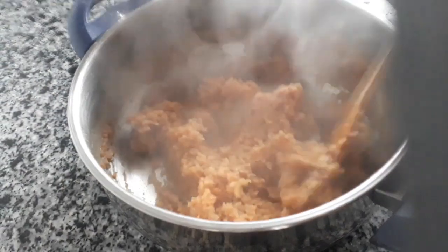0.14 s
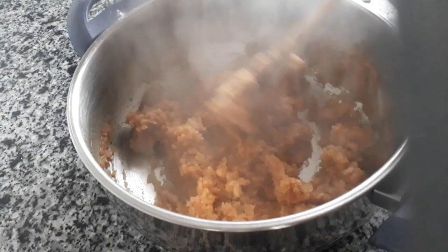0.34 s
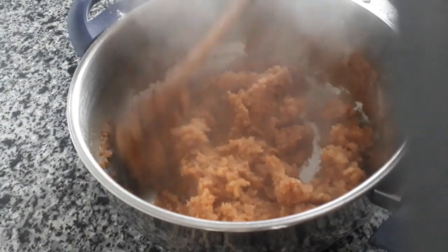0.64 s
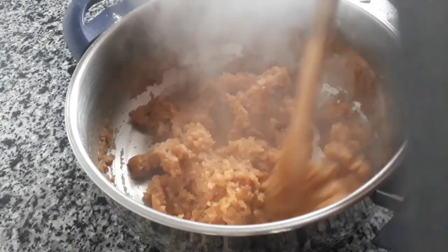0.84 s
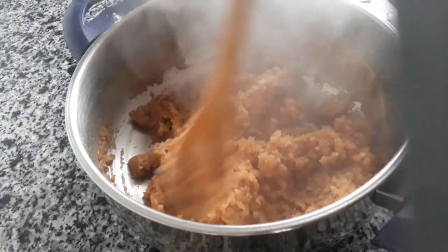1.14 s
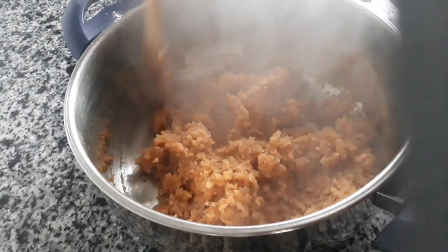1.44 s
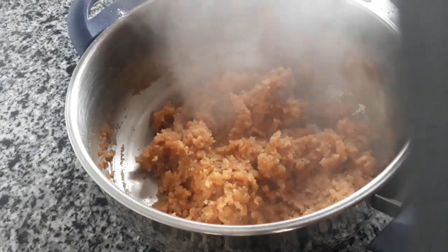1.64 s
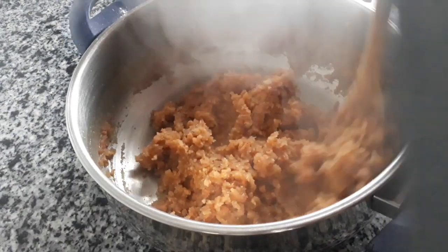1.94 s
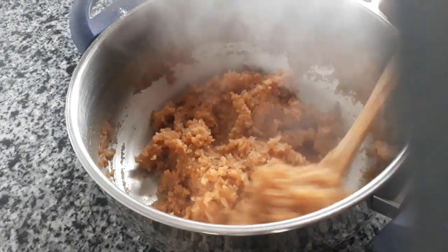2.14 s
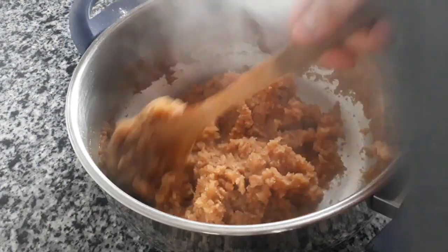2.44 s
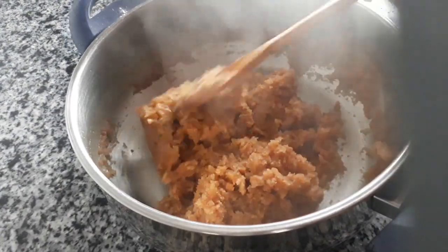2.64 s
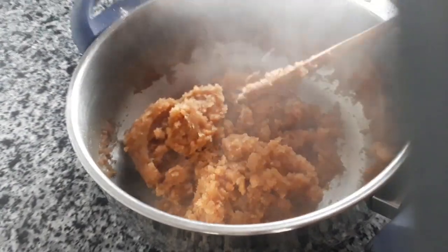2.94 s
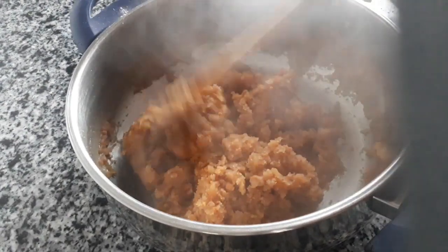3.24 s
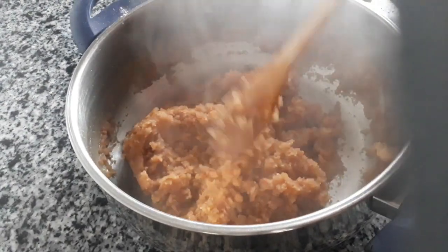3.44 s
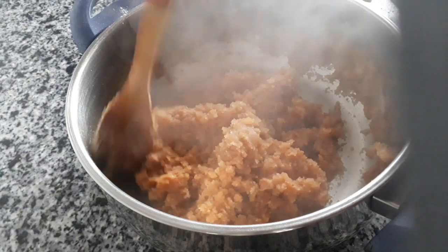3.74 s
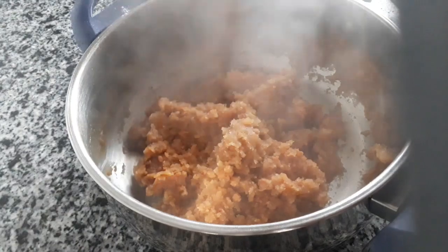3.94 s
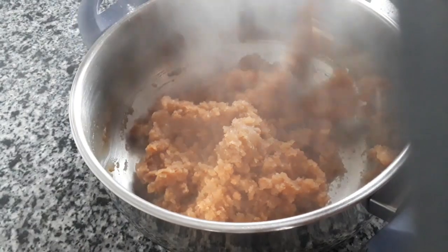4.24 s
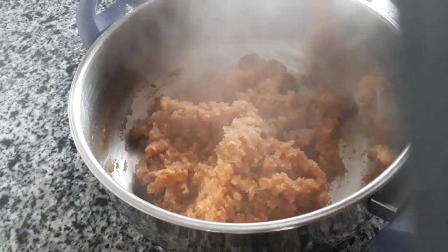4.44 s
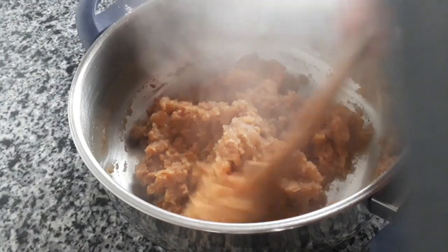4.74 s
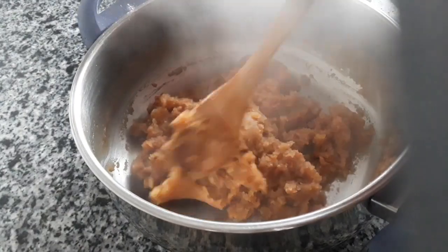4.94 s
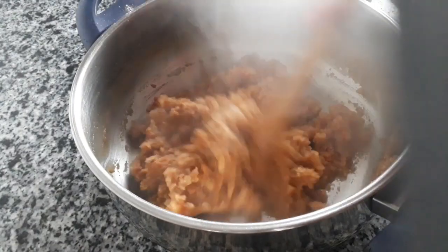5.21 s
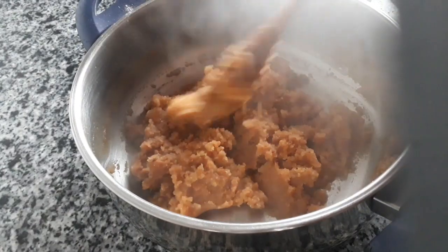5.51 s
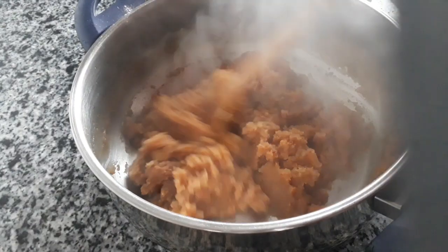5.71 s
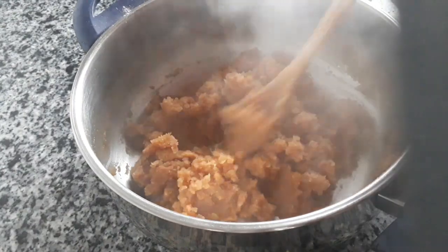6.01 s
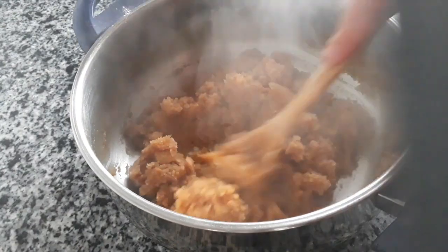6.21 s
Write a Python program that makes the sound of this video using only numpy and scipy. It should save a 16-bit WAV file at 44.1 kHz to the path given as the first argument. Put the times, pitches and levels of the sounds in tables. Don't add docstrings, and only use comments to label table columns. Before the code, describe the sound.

Close up in a tiled kitchen, a wooden spoon pushes thick paste around a steel pot. Quiet wet scrapes, dull thuds and small taps come first; near three seconds a very loud double knock cracks against the metal and wakes the room. Stickier scraping, paste snaps and a second firm knock follow, then gentle stirring with faint steam over low hum and hiss.

```python
import sys
import numpy as np
from scipy import signal
from scipy.fft import rfft, irfft, next_fast_len
from scipy.io import wavfile
from scipy.ndimage import uniform_filter1d, map_coordinates

SR = 44100
rng = np.random.default_rng(int(sys.argv[2]) if len(sys.argv) > 2 else 0)


def gain_from_db(level_db):
    decades = np.asarray(level_db, float) / 20
    return 10 ** decades


def int16_out(signal):
    q = np.round(np.clip(np.atleast_2d(signal).T, -1, 1) * 32767)
    wavfile.write(sys.argv[1], SR, q.astype(np.int16))


N = 280917

# (time [s], strength [dB], lean to the lower body mode [dB],
# centre ring [dB], edge ring [dB])
BASE_BLOWS = [(0.204, -44.5, -0.5, -5.5, 6), (0.5835, -52, 1.5, -14, -14), (0.7693, -41, 1, 2.5, -11),
              (1.2836, -41.5, 0, 0, -23), (1.7678, -63.5, -1, 1, -15), (2.381, -84, 0, 6, 17),
              (2.9209, -26, 0.5, -6.5, -11), (2.9776, -31.5, 1.5, -0.5, -1.5),
              (2.9889, -33.5, -2.5, -2.5, -14), (3.7136, -48.5, 3, -6, 4.5), (4.0401, -60, -.6, -9.5, -15),
              (4.4264, -32, -0.5, 3.5, 5), (5.149, -36, 1.4, 0, -0.5), (6.1831, -63, 1.5, -4, -15)]
# (pitch [Hz], fade by 60 dB [s], rise [s])
BASE_MODES = [(1084, 0.019, 0.00071), (235, 0.24, 0.0077), (321.8, 0.024, 0.035), (398, 0.029, 0.0062),
              (716, 0.049, 0.00037)]


def thuds():
    out = np.zeros(N + SR)
    t = np.arange(SR // 5) / SR
    deep_db = -14
    for s, blow_db, lean_db, centre_db, edge_db in BASE_BLOWS:
        strength_db = blow_db + np.array([edge_db, deep_db, lean_db, -lean_db, centre_db])
        detune = 1 + 0.023 * rng.standard_normal(len(BASE_MODES))
        modes = []
        for db, shift, (hz, t60, rise) in zip(strength_db, detune, BASE_MODES):
            modes.append(gain_from_db(db) * ring(hz * shift, t60, rise, t))
        add(out, s, kitchen(modes[0] + modes[-1], wet_db=-6.0, blow_s=0.033))
        add(out, s, kitchen(sum(modes[1:-1]), wet_db=-4, blow_s=0.04))
    return out[:N]


# (time [s], level [dB], pitch [Hz], room mode level [dB])
WORKTOP_BLOWS = [(0.202, -49, 181, -63), (0.58, -52, 194, -66), (0.768, -52.5, 175, -68),
                 (1.286, -51.5, 175, -67.5), (1.784, -61, 142, -76), (2.457, -60, 160, -93),
                 (2.694, -62, 156, -84), (2.92, -27.5, 146, -66), (2.978, -40.5, 191, -50.5),
                 (3.708, -52, 210, -67.5), (3.859, -70, 150, -71), (4.427, -46.5, 142, -75),
                 (5.151, -49.5, 158, -85), (5.711, -65, 133, -89), (5.879, -61.5, 127, -83),
                 (6.179, -63, 172.6, -79.5)]


def worktop_booms():
    out = np.zeros(N + SR)
    t = np.arange(SR // 2) / SR
    for s, db, hz, room_db in WORKTOP_BLOWS:
        add(out, s, kitchen(gain_from_db(db) * ring(hz, 0.056, 0.00277, t), wet_db=1.0, blow_s=0.54))
        add(out, s, gain_from_db(room_db) * ring(94.5, 0.42, 0.016, t))
    return out[:N]


# (time [s], crack level [dB], spoon level [dB], wall pitch [Hz], wall level [dB])
HARD_BLOWS = [
    (2.9185, -9.5, -23, 2170, -18),
    (2.9844, -36.5, -41, 2510, -24.5),
    (2.9847, -26.5, -36, 3950, -35),
]
SOFT_BLOWS = [
    (0.2051, -42.5, -43.5, 2020, -48),
    (0.7692, -44, -80, 2250, -58),
    (4.4257, -33, -29, 2140, -30.5),
    (5.1507, -41.5, -42, 2900, -59),
]
RIM_TAPS = [
    (0.5826, -24.5, -40, 4610, -49),
    (3.7113, -54, -40, 2400, -44.5),
    (3.7126, -37.5, -70, 840, -39.5),
    (3.7128, -26.5, -48, 3434, -47),
]
PASTE_BUMPS = [
    (3.849, -59, -72, 335, -47.5),
    (3.851, -63, -67, 542, -60),
    (4.093, -58, -70, 410, -57.5),
]
DRY_TOUCHES = [(0.4484, -32, -55, 5380, -56), (1.3443, -30, -62, 2650, -52.5),
               (1.3446, -55, -88, 3500, -56), (1.7853, -42, -62, 3500, -63), (2.0148, -51, -76, 1360, -58),
               (2.3814, -49, -62, 754, -57), (3.1847, -49, -75, 4020, -49.5), (3.185, -59, -64, 7360, -55),
               (4.8047, -38, -78, 3640, -59), (6.2197, -52, -72, 1277, -45)]
# (pitch [Hz], level [dB])
HARD_COLOUR = [(400, -32), (800, -27), (1200, -7), (1760, -9), (2280, -10.5), (3300, -22), (6200, -8),
               (9710, -26.5), (14800, -31.5), (16200, -56)]
SOFT_COLOUR = [(1530, -2.5), (2600, -20), (3960, -24), (5850, -7.5), (8640, -20.5), (12000, -22),
               (16200, -34)]
RIM_COLOUR = [(2060, -13.5), (3500, -15.5), (4030, -17), (6860, -2), (9390, -10.5), (11600, -4),
              (14900, -14), (16200, -38)]
DRY_COLOUR = [(710, -33), (1200, -13), (2320, 9), (4210, 0), (5380, -1), (9090, -18), (14000, -26.5)]
# (hard [s], soft [s], rim [s], life [s])
BRIEF_TIMES = (.005, .011, .004, .0045)


def spoon_on_wall():
    hard_s, soft_s, rim_s, dry_crack_s = BRIEF_TIMES
    hard = clacks(HARD_BLOWS[:1], HARD_COLOUR, crack_s=0.019, ring_s=0.021, wet_db=-1.0, blow_s=hard_s)
    hard += clacks(HARD_BLOWS[1:], HARD_COLOUR, crack_s=0.013, ring_s=0.012, wet_db=-10, blow_s=hard_s)
    soft = clacks(SOFT_BLOWS, SOFT_COLOUR, crack_s=0.042, ring_s=0.016, wet_db=-4, blow_s=soft_s)
    rim = clacks(RIM_TAPS, RIM_COLOUR, crack_s=0.021, ring_s=0.028, wet_db=-10, blow_s=rim_s)
    soft += clacks(PASTE_BUMPS, SOFT_COLOUR, crack_s=0.014, ring_s=0.11, wet_db=-13, blow_s=0.034)
    dry_touches = clacks(DRY_TOUCHES, DRY_COLOUR, crack_s=dry_crack_s, ring_s=0.013, wet_db=-13.0,
                         blow_s=rim_s)
    return hard + soft + rim + dry_touches


def clacks(blows, steel, crack_s, ring_s, wet_db, blow_s):
    out = np.zeros(N + SR)
    t = np.arange(SR // 10) / SR
    spoon_hz = 1595
    for s, crack_db, spoon_db, wall_hz, wall_db in blows:
        rattle = rng.standard_normal(len(t)) * gain_from_db(-60 * t / crack_s) * (1 - np.exp(-t / 0.000093))
        z = rfft(rattle)
        even = z * np.linalg.norm(rattle) / uniform_filter1d(abs(z), size=14)
        rattle = irfft(even, len(t)) * gain_from_db(-20 * t / crack_s)
        steel_gain = np.sqrt(np.mean(colour(steel)(np.linspace(0, SR / 2, 512)) ** 2))
        crack = gain_from_db(crack_db - 11.5) / steel_gain * filtered(rattle, colour(steel))
        spoon = gain_from_db(spoon_db) * ring(spoon_hz, ring_s, 0.00025, t)
        wall = ring(wall_hz, ring_s, 0.00032, t) + 0.33 * ring(1.21 * wall_hz, ring_s, 0.00007, t)
        add(out, s - .0003, kitchen(spoon + gain_from_db(wall_db) * wall, wet_db, blow_s, crack))
    return out[:N]


# (time of full push [s], swell [s], wet rasp [dB], rub on steel [dB],
# weight on the base [dB])
STIR_STROKES = [(0.04, 0.054, -76.5, -75.5, -74.5), (0.3, 0.3, -74.5, -80, -78), (0.44, .12, -77, -80, -97),
                (0.74, 0.31, -68.5, -78, -86), (1.0, 0.22, -73.5, -92, -99), (1.13, 0.058, -89, -90, -71),
                (1.55, 0.27, -76.5, -75, -81.5), (1.8, 0.54, -78, -73, -75.5),
                (2.02, 0.19, -75, -70.5, -72.5), (2.4, 0.043, -70, -71.5, -74),
                (2.47, 0.097, -68, -77.5, -71.5), (2.69, 0.18, -70.5, -77.5, -71),
                (3.31, 0.053, -84, -89, -81.5), (3.45, 0.17, -75, -97, -77.5), (3.58, .08, -95.5, -89, -86),
                (3.78, 0.094, -60, -62.5, -70), (3.89, 0.11, -72, -69, -86),
                (4.07, 0.29, -68.5, -68, -67.5), (4.34, 0.27, -77, -78.5, -88), (4.56, 0.28, -70, -70, -72),
                (4.94, 0.24, -69, -75, -90), (5.31, .15, -67, -69.5, -85), (5.44, 0.17, -81, -76.5, -76),
                (5.9, 0.36, -71.5, -77, -76)]
# (rasp [dB], rub [dB], rumble [dB])
REST_LEVELS = (-78.5, -80.5, -84)


def stroke_levels():
    return [np.hypot(push, gain_from_db(db)) for push, db in zip(swells(STIR_STROKES), REST_LEVELS)]


# (pitch [Hz], level [dB])
PASTE_COLOUR = [(2060, -55), (3500, -14.5), (3830, -17.5), (6820, -5), (9140, -11), (9560, -18.5),
                (10500, -10.5), (14800, -14.5), (16000, -10)]
# (pitch [Hz], level [dB])
RUB_COLOUR = [(350, -10), (600, -5), (704, -3.5), (818, -3.5), (1660, -3.5), (2170, -10), (2690, -5.5),
              (5000, -16.5), (6500, -49), (11000, -120)]
# (pitch [Hz], width [Hz], level [dB])
RUMBLE_MODES = [(156, 140, -7.5), (245.6, 27, 1.5), (335, 100, 2), (390, 300, -2), (754, 32, -3.5)]


def drag(wet, dry, weight):
    rasp = unit(filtered(grainy(spike_db=6.5, clump_db=4.0, rate=140), colour(PASTE_COLOUR)))
    rub = unit(filtered(grainy(spike_db=6.5, clump_db=6.0, rate=31), colour(RUB_COLOUR)))
    rumble = unit(filtered(grainy(spike_db=-1.0, clump_db=4.0, rate=6.4), resonances(RUMBLE_MODES)))
    return wet * rasp + dry * rub + weight * rumble


# (time [s], level [dB], pitch [Hz])
PASTE_TICKS = [(0.019, -57, 6640), (0.4945, -69, 7160), (0.616, -79, 6860), (1.4526, -67, 6900),
               (1.745, -53, 7150), (1.786, -63, 3700), (2.4565, -58, 8850), (2.518, -49.5, 4640),
               (2.5701, -54, 4830), (2.5965, -65, 5830), (2.9374, -42.5, 10200), (2.9454, -38, 11900),
               (2.9904, -50, 10500), (3.0026, -41.5, 10560), (3.1855, -51.5, 10800), (3.274, -61, 3417),
               (3.3465, -55, 6450), (3.782, -40, 6080), (3.866, -46.5, 7200), (3.8934, -49, 6200),
               (4.002, -59, 6820), (4.039, -46, 5820), (4.0517, -44, 6100), (4.104, -46.5, 5970),
               (4.474, -44, 3020)]


def ticks():
    out = np.zeros(N + SR)
    t = np.arange(SR // 50) / SR
    for s, db, hz in PASTE_TICKS:
        puff = unit(filtered(rng.standard_normal(len(t)), colour(PASTE_COLOUR))) * gain_from_db(-60 * t / 0.013)
        snap = 1.6 * ring(hz, 0.01, .0002, t) + 1.1 * puff
        add(out, s, kitchen(gain_from_db(db - 12.5) * snap, wet_db=-7, blow_s=0.0049))
    return out[:N]


# (time of full pull [s], swell [s], level [dB])
PEELS = [
    (2.46, .04, -107),
    (2.63, .09, -65.5),
    (3.89, .09, -60),
    (3.975, .05, -69),
    (4.05, .04, -68),
    (4.14, .1, -73),
    (6.22, .12, -73),
    (6.37, .04, -62),
]


def peel():
    fizz = unit(filtered(grainy(spike_db=5, clump_db=3.0, rate=100), colour(PASTE_COLOUR)))
    return gain_from_db(-2.0) * swells(PEELS)[0] * fizz


# (time of full flow [s], swell [s], low vent [dB], high vent [dB])
STEAM_PUFFS = [(0.43, .2, -85, -86), (0.52, 0.065, -79, -72), (0.72, 0.31, -90, -89),
               (0.97, 0.46, -86, -84.5), (1.2, 0.25, -85, -84), (1.265, .14, -81, -82.5),
               (2.0, .15, -95, -80), (4.95, 0.23, -82, -87), (5.29, 0.095, -78, -77),
               (5.41, 0.12, -82, -77), (5.9, 0.16, -87.5, -80)]
# (pitch [Hz], width [Hz], unused level [dB])
VENTS = [(3640, 85, 3), (7120, 100, -3)]


def steam():
    out = np.zeros(N)
    wander = 0.018
    for flow, (hz, width_hz, _) in zip(swells(STEAM_PUFFS), VENTS):
        breath = grainy(spike_db=5.0, clump_db=6.5, rate=29)
        low, high = [unit(filtered(breath, resonances([(hz * (1 + side * wander), width_hz, 0)])))
                     for side in (-1, 1)]
        turn = np.pi / 4 * (1 + np.tanh(0.89 * wobble(9.9)))
        out = out + flow * (np.cos(turn) * low + np.sin(turn) * high)
    return out


# (delay [s], level [dB])
EARLY_ECHOES = [(.0021, -4.5), (.0043, -7.5), (.0072, -10), (.0115, -15.5), (.0175, -29), (.026, -12)]
# (pitch [Hz], fade by 60 dB [s])
ROOM_FADE = [(120, 0.32), (500, 0.41), (2000, 0.5), (5000, 0.46), (9000, 0.22), (14000, 0.19)]
# (pitch [Hz], level [dB])
ROOM_COLOUR = [(100, -6.5), (300, -0.5), (700, -1.5), (1500, -4), (3000, -4.5), (7000, 0), (14000, 2)]


def kitchen(sound, wet_db, blow_s, crack=0):
    hz, t, z = signal.stft(rng.standard_normal(SR // 2), SR, nperseg=256)
    fading = z * gain_from_db(-60 * t / along(ROOM_FADE, hz)[:, None])
    tail = signal.istft(fading, SR, nperseg=256)[1][:SR // 2]
    tail = tail * (1 - np.exp(-np.arange(SR // 2) / SR / 0.0024))
    tail = filtered(tail / np.linalg.norm(tail), colour(ROOM_COLOUR))
    near = np.zeros(SR // 2)
    for s, db in EARLY_ECHOES:
        near[round(s * SR)] = gain_from_db(db + wet_db)
    near[0] = 1
    blow = sound * gain_from_db(-60 * np.arange(len(sound)) / SR / blow_s)
    blow = blow * np.linalg.norm(sound) / np.linalg.norm(blow)
    direct = signal.fftconvolve(sound + crack, near)
    return direct + gain_from_db(wet_db) * signal.fftconvolve(blow + crack, tail)


# (pitch [Hz], width [Hz], level [dB])
HUM_MODE = [(111.7, 80, 0)]


def distant_hum(weight):
    hum = unit(filtered(rng.standard_normal(N), lambda f: resonances(HUM_MODE)(f) ** 2))
    steady = gain_from_db(-80 - 0.5 * wobble(7.9))
    return np.hypot(steady, gain_from_db(-9.5) * weight) * hum


# (pitch [Hz], level [dB])
HISS_COLOUR = [(15, -24.5), (25, -14), (36, -21), (53, -37), (114, -15.5), (373, -9), (439, -13),
               (840, -16), (1610, -17), (5000, -22.5), (7110, -25.5), (9570, -33), (11000, -27),
               (14800, -25.5), (16000, -30)]


def microphone_hiss():
    return gain_from_db(-73) * unit(filtered(rng.standard_normal(N), colour(HISS_COLOUR)))


def swells(rows):
    s, swell_s, *levels_db = np.transpose(rows)[..., None]
    climb_db, let_go = 25, 0.58
    lag = (np.arange(0, N + 64, 64) / SR - s) / swell_s
    shape_db = -climb_db * np.where(lag < 0, lag ** 2, (lag / let_go) ** 2)
    power = [np.sum(gain_from_db(2 * (db + shape_db)), axis=0) for db in levels_db]
    return [np.sqrt(np.interp(np.arange(N) / 64, np.arange(len(p)), p)) for p in power]


def ring(hz, t60, rise, t):
    shape = gain_from_db(-60 * t / t60) * (1 - np.exp(-t / rise)) ** 2
    return shape / shape.max() * np.sin(2 * np.pi * hz * t)


def grainy(spike_db, clump_db, rate):
    clumps = np.clip(clump_db, 0, 1.7) * wobble(rate)
    sizes = np.clip(rng.exponential(size=N), 0, 3.5)
    return rng.standard_normal(N) * gain_from_db(spike_db * sizes + clumps)


def wobble(rate):
    knots = rng.standard_normal(int(N * rate / SR) + 4)
    return map_coordinates(knots, [np.arange(N) * rate / SR])


def resonances(peaks):
    def response(f):
        total = 0
        for k, (c, w, db) in enumerate(peaks):
            total = total + (-1) ** k * gain_from_db(db) * 1j * f * w / (c * c - f * f + 1j * f * w + 1e-9)
        return total
    return response


def colour(points):
    return lambda hz: gain_from_db(along(points, hz))


def along(points, hz):
    f, v = np.transpose(points)
    return np.interp(np.log(hz + 1), np.log(f + 1), v)


def filtered(x, response):
    m = next_fast_len(len(x) + 8192)
    return irfft(rfft(x, m) * response(np.fft.rfftfreq(m, 1 / SR)), m)[:len(x)]


def unit(x):
    return x / np.sqrt(np.mean(x ** 2) + 1e-20)


def add(track, s, sound):
    track[round(s * SR):][:len(sound)] += sound


def scene():
    top_hz = 15540
    blows = thuds() + worktop_booms() + spoon_on_wall() + ticks()
    blows = filtered(blows, colour([(top_hz, 0), (16300, -18)]))
    wet, dry, weight = stroke_levels()
    steady = drag(wet, dry, weight) + distant_hum(weight) + peel() + steam() + microphone_hiss()
    steady = filtered(steady, lambda hz: hz < top_hz)
    low_cut = signal.butter(3, 78, "high", fs=SR, output="sos")
    return (signal.sosfilt(low_cut, blows) + steady)[None]


def roll_off(x):
    return signal.sosfilt(signal.butter(12, 16340, fs=SR, output="sos"), x)


def record(dry):
    mix = dry - .0004
    return roll_off(mix)


dry = scene()
out = record(dry)
int16_out(out)
```